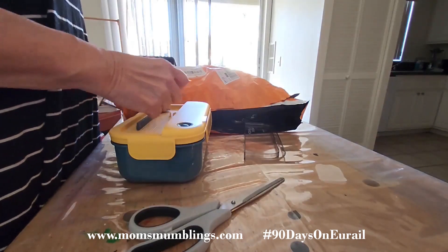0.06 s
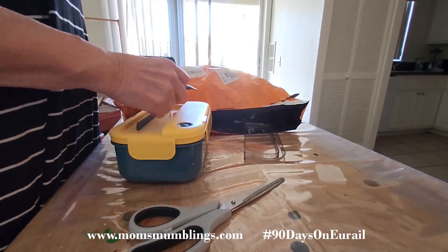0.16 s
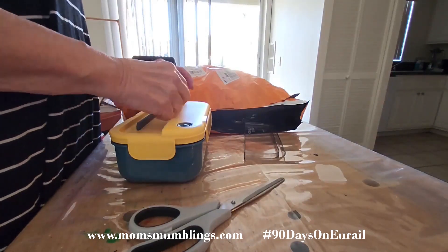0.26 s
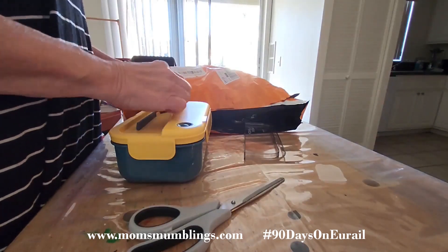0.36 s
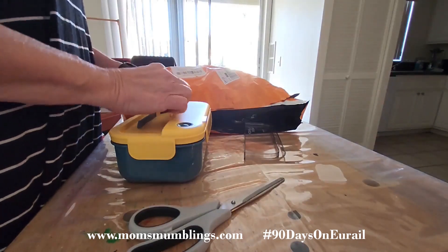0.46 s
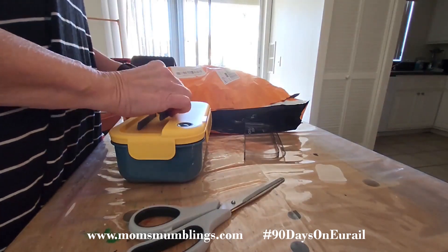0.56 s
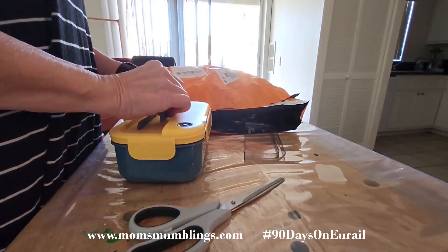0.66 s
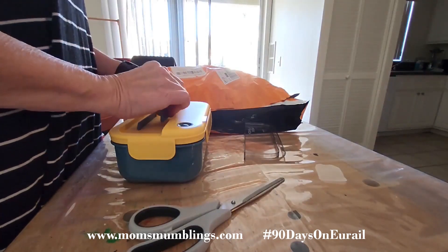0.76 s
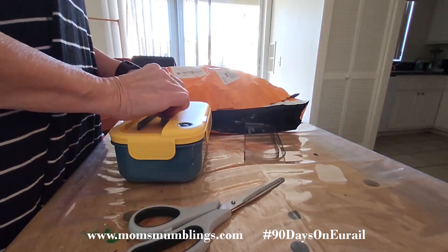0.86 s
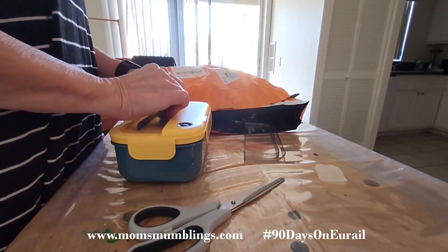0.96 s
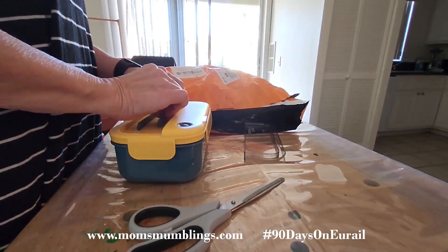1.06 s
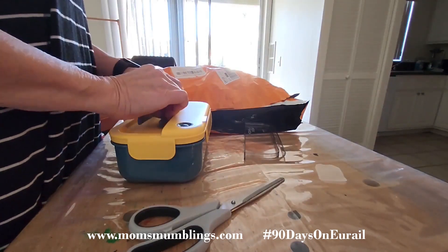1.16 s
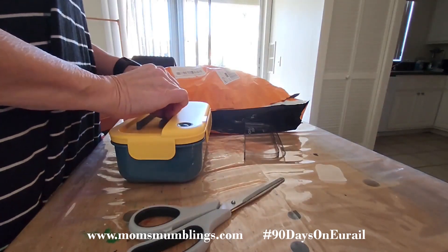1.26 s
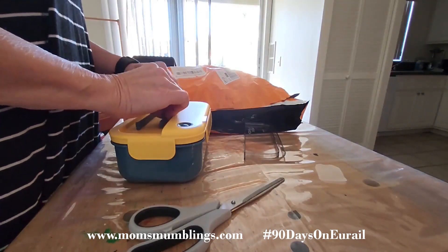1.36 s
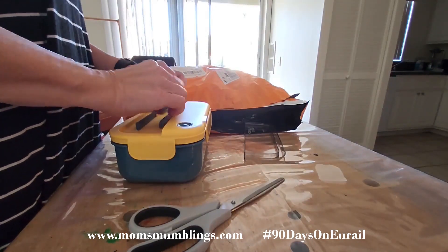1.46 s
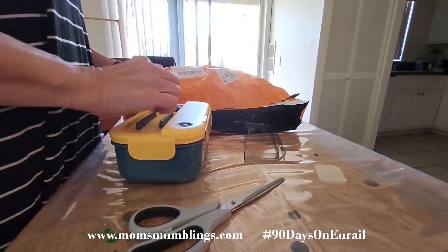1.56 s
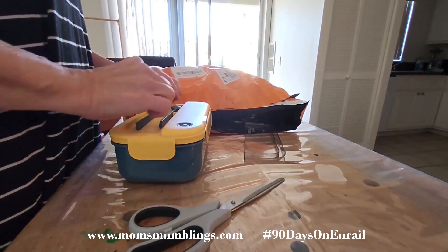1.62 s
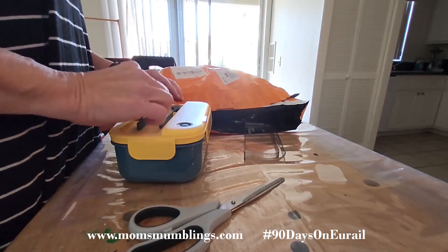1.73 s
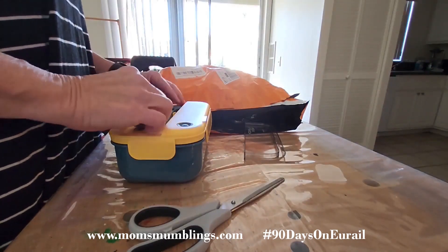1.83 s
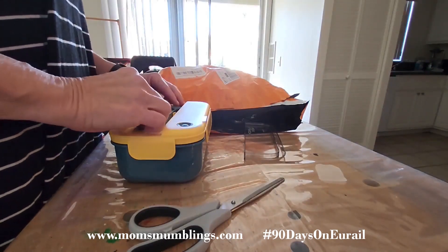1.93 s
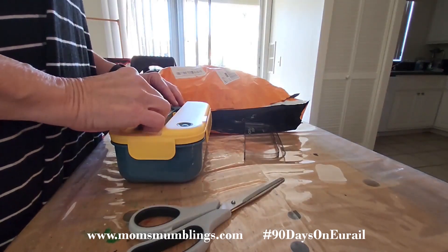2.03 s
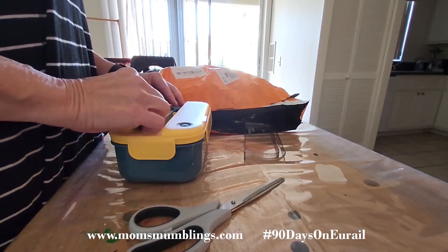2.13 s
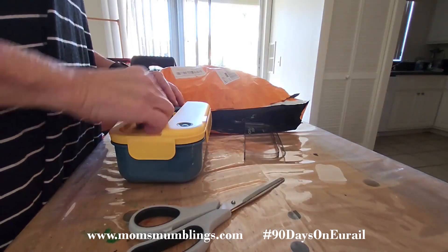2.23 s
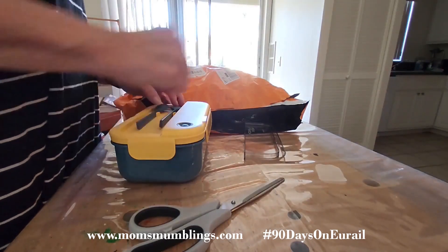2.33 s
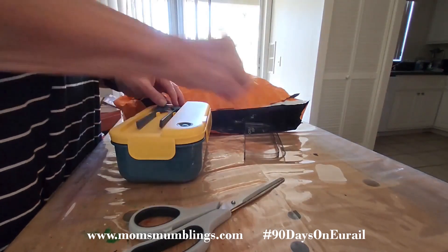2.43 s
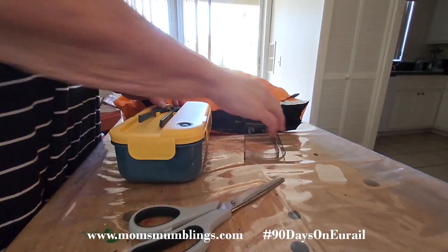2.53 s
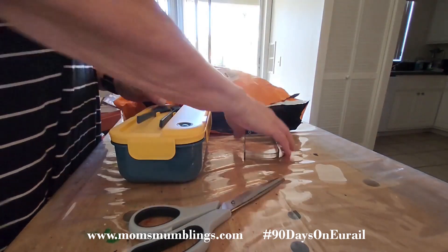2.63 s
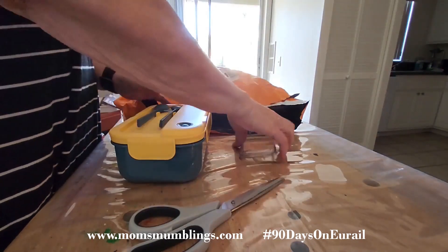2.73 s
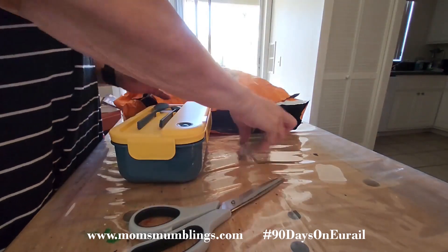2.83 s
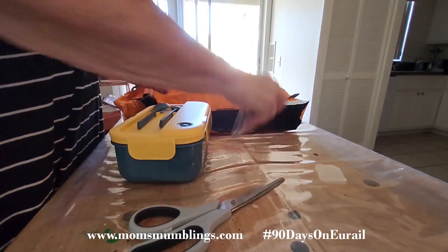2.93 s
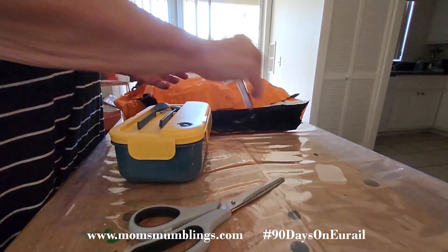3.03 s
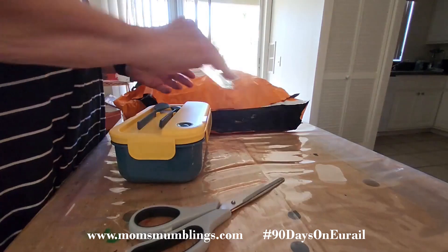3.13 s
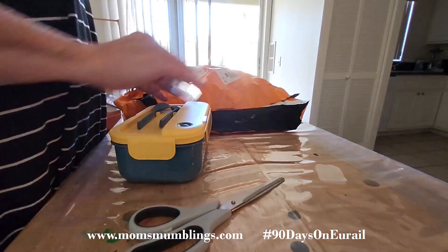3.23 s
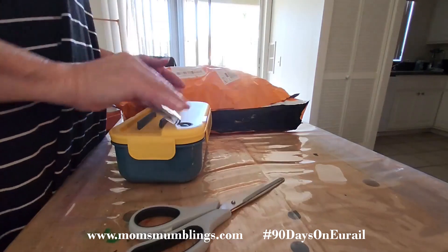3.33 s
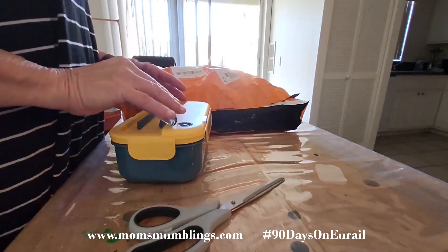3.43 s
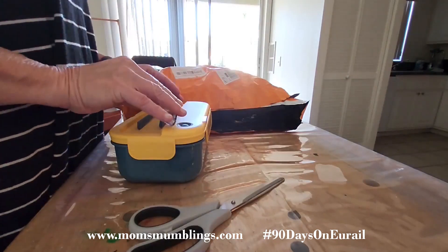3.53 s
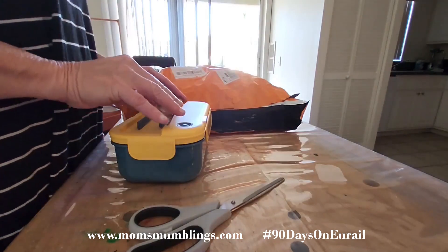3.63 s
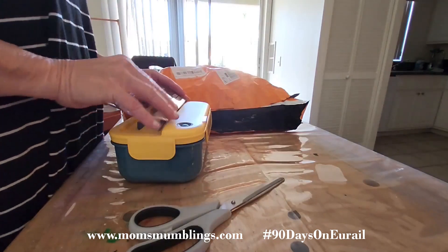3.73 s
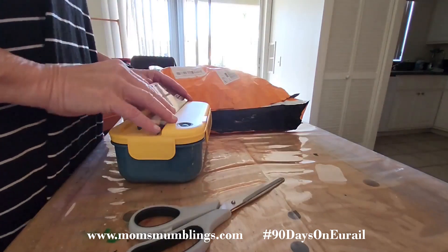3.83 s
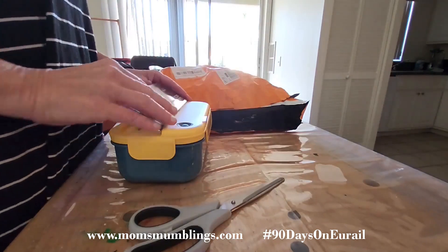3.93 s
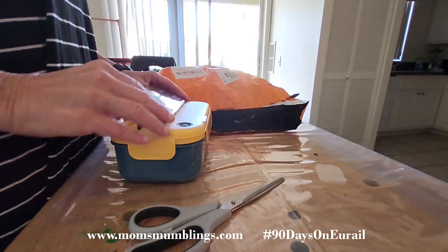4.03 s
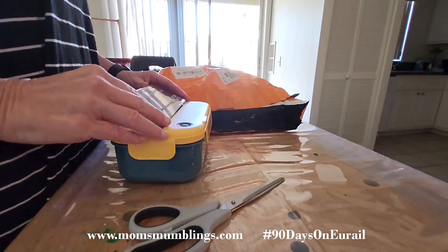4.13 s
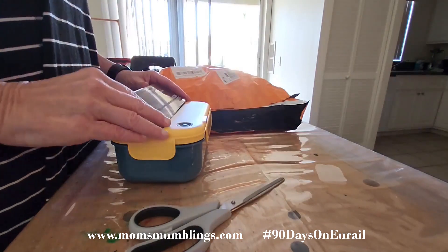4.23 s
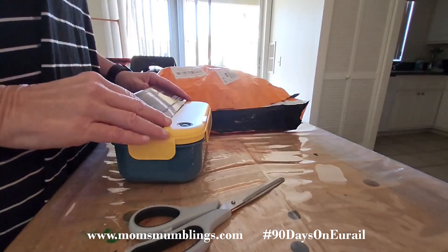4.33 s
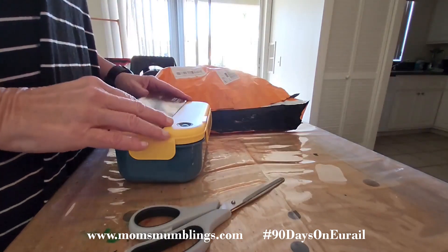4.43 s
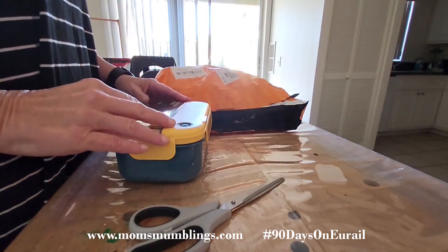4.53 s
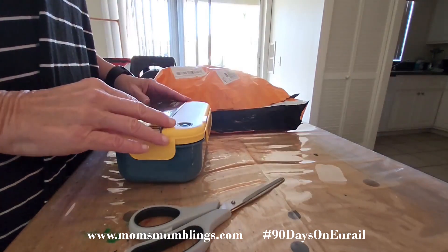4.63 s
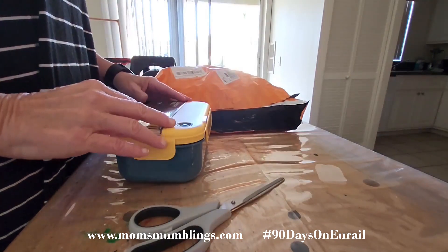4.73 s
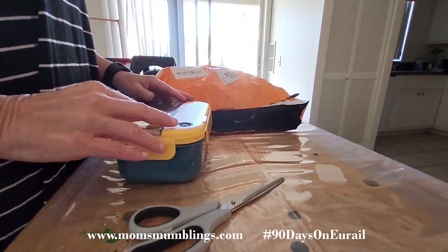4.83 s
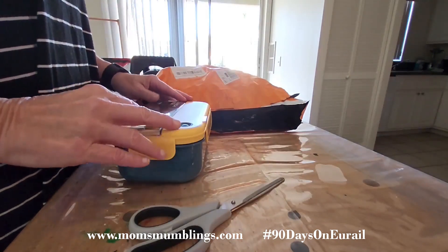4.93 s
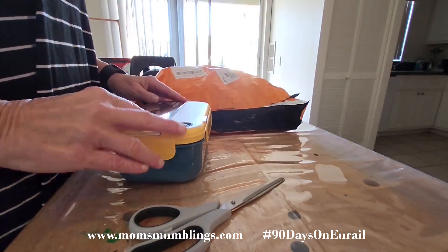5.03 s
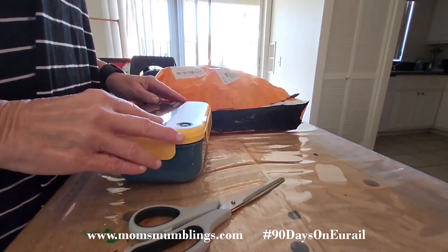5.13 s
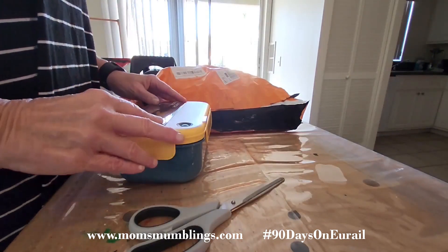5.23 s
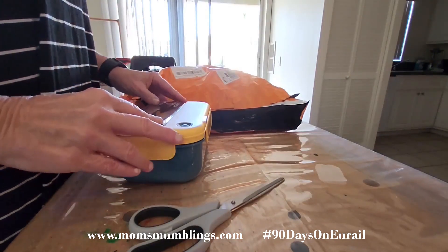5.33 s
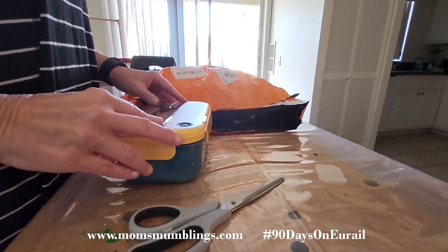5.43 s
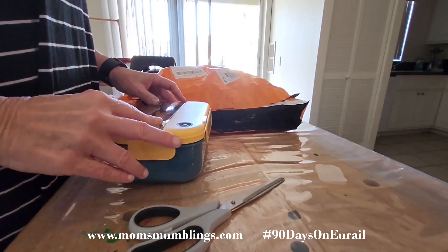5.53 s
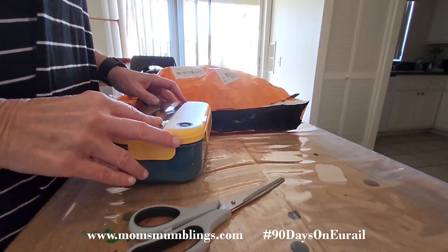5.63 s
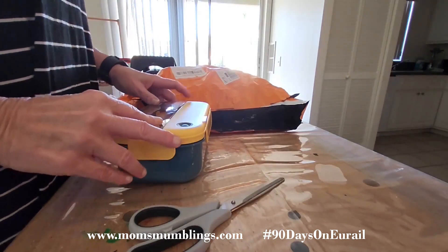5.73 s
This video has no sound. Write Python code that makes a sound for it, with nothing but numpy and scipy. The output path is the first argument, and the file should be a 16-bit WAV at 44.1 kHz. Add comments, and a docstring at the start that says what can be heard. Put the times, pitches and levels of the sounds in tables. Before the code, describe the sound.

Fingers rub the lid of a hard plastic lunch box and press plastic cutlery into it with uneven clicks and hollow knocks. A small steel tin then clinks, scrapes and briefly squeaks on the table. It is set on the lid and pushed until it snaps in loudly, followed by a few light taps. A nearby stereo microphone picks up a short kitchen echo and a low hum.

```python
"""Over a low room hum, fingers rub the lid of a hard plastic lunch box and press plastic cutlery into it:
each contact thuds the table, booms the hollow box and cracks in the lid. A hand knocks as it reaches for a
small steel tin, which clinks, grates and squeaks off the table near 3 s. Fingers brush it as they turn it,
set it on the lid at 3.5 s and push until it snaps home at 4.6 s. A few light taps follow. Throughout,
a hard-walled kitchen rings on around a nearby stereo microphone."""
import sys
import numpy as np
from scipy import signal
from scipy.fft import rfft, irfft
from scipy.io import wavfile
from scipy.ndimage import uniform_filter1d

SR = 44100
rng = np.random.default_rng(int(sys.argv[2]) if len(sys.argv) > 2 else 0)


def master(y):
    """Save y as 16-bit WAV."""
    cut = np.clip(np.atleast_2d(y).T, -1, 1)
    pcm = np.round(cut * 32767)  # scale
    wavfile.write(sys.argv[1], SR, pcm.astype(np.int16))


N = 254456
TIME = np.arange(N) / SR

# room tone spectrum: f/Hz, level/dB
ROOM_TONE = [(15, -34.5), (25, 7), (69, 5), (202, 0.5), (301, -15.5), (501, -10.5), (604, -24.5),
             (1310, -24.5), (1760, -34), (2180, -20.5), (3090, -36.5), (9520, -41.5), (15000, -52.5)]
# finger strokes on the lid: t/s, length/s, level/dB, grit/0-1
RUBS = [(-.06, .135, -48, .77), (.055, .05, -45, .2), (.465, .065, -51, .95), (.57, .045, -39.5, .4),
        (.845, .065, -44, .1), (1.24, .2, -41, .8), (1.46, .06, -34, .05), (1.53, .1, -49, .2),
        (2.02, .065, -49.5, .75), (2.17, .24, -58, .52), (2.425, .06, -52, .42), (2.73, .11, -56.5, .98),
        (3.57, .105, -46, .68), (3.775, .12, -50, .9), (3.877, .065, -43, .36), (3.973, .1, -46, .65),
        (4.12, .3, -58, .58), (4.33, .24, -46.5, .3), (4.5, .08, -35.5, .1), (4.57, .085, -32.5, .58),
        (5.6, .16, -72, .9)]
# rub layers, rows box body, lid, hiss: smooth level/dB, gritty level/dB
RUB_MIX = [(0, 0), (-18, 0), (-40, -6)]
# friction EQs for the hollow body, the lid's rustle and the gritty hiss: f/Hz, level/dB
BODY_EQ = [(60, -19.5), (150, -3), (300, -6.5), (400, 4.5), (500, 8.5), (620, -9.5), (1200, -59)]
LID_EQ = [(400, -20), (700, -1.5), (1300, 2.5), (1700, -4.5), (2500, -0.5), (3200, -23), (6000, -43)]
HISS_EQ = [(1500, -24), (3000, 4), (5000, 1.5), (7300, -1.5), (9000, -14), (15000, -24)]
# cutlery pressed into the lid: t/s, level/dB, hardness/0-1, extra table thud/dB
CUTLERY_KNOCKS = [(0.1031, -26.5, .73, -13), (0.1188, -28, .45, -12), (0.138, -38, .5, 2),
                  (0.3818, -52, .12, 16), (0.4368, -49, .05, -10), (0.4599, -44, .07, -1),
                  (0.4829, -45, .68, -4), (0.551, -40.5, .77, 1), (0.6637, -29, .46, -8),
                  (0.6912, -38, .5, -1), (0.7068, -29.5, .72, -18), (0.8774, -36, .66, -13),
                  (0.9828, -26, 0, 0), (0.9905, -25.5, .36, -1), (1.1027, -45, .33, -16),
                  (1.1576, -53.5, .65, -5), (1.2308, -43, .15, 0), (1.2645, -35, .43, 4),
                  (1.269, -29, .45, 2), (1.2752, -30.5, .86, -20), (1.283, -40, .92, 8),
                  (1.3887, -31, .53, 0), (1.424, -26, .8, -24), (1.4573, -42, .58, -7),
                  (1.477, -32.5, .55, -7), (1.4964, -39.5, .62, -7), (1.6102, -44, .37, -3),
                  (1.8825, -42.5, .52, -8), (1.9356, -41.5, .68, -4), (1.9866, -37, .74, -11),
                  (2.0068, -39, .5, 3), (2.0538, -46.5, .62, 5), (2.331, -51, .2, -7)]
# the hand knocks as it reaches for the tin (first three rows), then the tin knocks on the lid and
# snaps home: t/s, level/dB, hardness/0-1, extra table thud/dB
HAND_AND_TIN_KNOCKS = [(2.5887, -45.5, .46, 1), (2.6169, -35.5, .58, -10), (2.6237, -39, .76, 2),
                       (3.492, -30.5, .6, -4), (3.5088, -35.5, .54, -14), (3.8119, -40, .5, -1),
                       (3.9389, -27, .69, -11), (3.9544, -26, .42, -8), (4.0859, -34, .1, 3),
                       (4.2698, -43.5, .12, 1), (4.3969, -43, .35, -3), (4.6185, -15.5, .54, -6),
                       (4.6258, -15, .7, -10), (4.6421, -24, .79, -4), (4.6465, -28, .66, -2),
                       (5.0955, -53, .22, 11), (5.1109, -53, .26, 4), (5.2812, -51, .6, 0),
                       (5.2988, -31.5, .76, 2), (5.3773, -47.5, .8, -11)]
# the tin tipping and clinking on the table: t/s, level/dB, hardness/0-1, extra table thud/dB
TABLE_CLINKS = [(2.7998, -60, .5, 15), (2.8286, -49, .88, -7), (2.8456, -53, .88, 1), (2.904, -47, .5, -6),
                (2.972, -40.5, .42, -2), (3.004, -43.5, .86, -10), (3.0182, -31, .66, -9),
                (3.041, -36.5, .3, -12)]
# layers of those hits, rows thud, boom, clack, crack, tick: soft level/dB, hard level/dB
CUTLERY_MIX = [(-2, -3), (6, 0.5), (-7, -0.8), (-24, 5.8), (-43, 3.6)]
TIN_MIX = [(-2.5, 0), (1.5, -0.5), (-3.3, -1), (-24.5, 3.8), (-39.5, 5.5)]
TABLE_MIX = [(-2, 0), (2, -12), (-1, 0), (-14, 6), (-32, 6)]
# where each of those five layers begins: f/Hz
LAYER_EDGES = [105, 310, 600, 1520, 3500]
# resonances of the box with its lid, the cutlery and the hand-held tin: f/Hz, level/dB, t60/s
BOX_MODES = [(133, -5.5, 0.047), (183.9, -7, 0.087), (218, -6, .05), (266, -1.5, 0.057), (364.4, -6, 0.19),
             (411, 0, 0.055), (444, 0.5, 0.071), (505.8, -0.5, 0.1), (680, -8.5, .025), (792, -7.5, 0.027),
             (915, -3.5, 0.03), (1012.4, -7.5, 0.062), (1138, -6.5, .03), (1295, -4.5, 0.048),
             (1411, -3, 0.046), (1600, -1.5, 0.036), (1866, -7, .018), (2043, 1.5, 0.022),
             (2200, -3.5, 0.01), (2510, 0, 0.032), (2914, -11.5, 0.004)]
CUTLERY_MODES = [(2870, -5, .012), (3226, -11, 0.0051), (3695, 1, 0.023), (4070, -1.5, .018),
                 (4290, -7, 0.028), (4890, -9, 0.015), (8200, -5, 0.013)]
TIN_MODES = [(1440, -7, 0.05), (1836, -3, 0.1), (2411, 4.5, 0.067), (2628, -6.5, 0.12), (2860, -7, .03),
             (3817, -9.5, .05), (4200, -11, 0.042), (4470, -8, 0.12), (4600, -9, .05), (5010, -3.5, 0.043),
             (5120, -1.5, .03), (6130, -10, .03), (6550, -8, 0.047), (10000, -15, .05)]
# EQ for the tick on top of a hit: f/Hz, level/dB
TICK_EQ = [(3000, 5.5), (5000, -1), (7300, -1), (9000, -11), (12000, -11), (15000, -10)]
# envelopes of the tin's slide: t/s, table rumble level/dB, grating rim level/dB
TIN_DRAG = [(2.89, -67, -64), (2.906, -46, -58), (2.926, -54, -43), (2.964, -55, -49), (2.976, -36, -49),
            (2.99, -49, -47), (3.018, -35, -34), (3.064, -38, -48), (3.1, -52, -53)]
# EQ for the table top rumbling under the tin: f/Hz, level/dB
TABLE_EQ = [(60, -21), (270, -10.5), (470, -6), (538, 6.5), (590, -6), (640, 2), (700, -1), (800, 3),
            (950, -3.5), (1500, -3), (2800, -17.5), (6000, -34.5)]
# the rim's squeak on the table: start t/s, end t/s, f/Hz, level/dB
SQUEAK = (2.914, 2.974, 2185, -49)
# finger strokes on the tin: t/s, length/s, level/dB
TIN_BRUSHES = [(3.15, .11, -59), (3.334, .075, -52), (3.62, .055, -57), (3.835, .04, -46), (4.15, .13, -65)]
# stereo tilt of the direct sound: f/Hz, left minus right level/dB
STEREO_TILT = [(100, 1.5), (400, 0.5), (1000, 0.5), (2300, 15), (3300, 1.5), (5000, -11), (8000, -5.5),
               (11000, -9.5), (14000, 13.5)]
# kitchen reverb: f/Hz, t60/s, level/dB
KITCHEN = [(60, .4, -4), (130, .75, -1.5), (253, 0.27, -3.5), (400, 0.28, -3.5), (515, .33, -10.5),
           (685, 0.34, -2.5), (1300, 0.36, -7.5), (2350, .38, -9.5), (3700, 0.25, -3), (5260, .38, -4),
           (8000, 0.25, -3), (15000, 0.25, 0)]


def undb(db):
    """Decibels to gain."""
    return 10 ** (np.asarray(db) / 20)


def unit(x):
    """Scale to rms 1."""
    return x / np.sqrt(np.mean(x ** 2))


def along(hz, points, column=1):
    """Read a column of a table on a log-frequency axis."""
    table = np.array(points, float)
    return np.interp(np.log(np.maximum(hz, 1)), np.log(table[:, 0]), table[:, column])


def blend(mix, share):
    """Crossfade in dB from a mix's first column to its second."""
    first, second = np.transpose(mix)
    return first + np.clip(share, 0, 1) * (second - first)


def causal(x, gain):
    """Minimum-phase filter from gains on an even frequency grid."""
    cepstrum = irfft(np.log(gain))
    half = len(cepstrum) // 2
    cepstrum[1:half] *= 2
    cepstrum[half + 1:] = 0
    impulse = irfft(np.exp(rfft(cepstrum)))
    return signal.fftconvolve(x, impulse[None], axes=-1)[:, :x.shape[-1]]


def eq(x, curve):
    """Shape a sound with a curve of f/Hz, level/dB."""
    hz = np.fft.rfftfreq(2048, 1 / SR)
    return causal(x, undb(along(hz, curve)))


def cut(x, hz, kind, order=3):
    """Butterworth filter."""
    sos = signal.butter(order, np.minimum(hz, SR / 2 - 100), kind, fs=SR, output="sos")
    return signal.sosfilt(sos, x)


def fade(t, t60):
    """Exponential decay, 60 dB down at t60."""
    return np.exp(-np.log(1000) * t / t60)


def room_tone(air_db=-64.5, width=0.18, hum_hz=59.3, hum_db=-61.5, waver=.5):
    """A bed of low room rumble with the wavering hum of an appliance."""
    noise = rng.standard_normal((3, N))
    air = unit(eq(noise[:1] + width * noise[1:], ROOM_TONE))
    swell = 1 + waver * unit(cut(rng.standard_normal(N), 5.3, "lowpass", order=2))
    hum = unit(swell * np.sin(2 * np.pi * hum_hz * TIME))
    return undb(air_db) * air + undb(hum_db) * hum


def friction(slips_per_s, spread_db, width):
    """Dense tiny slips of uneven size, some shared by both channels and some on one side only."""
    slipping = rng.random((3, N)) < slips_per_s / SR
    slips = slipping * rng.standard_normal((3, N)) * undb(spread_db * rng.standard_normal((3, N)))
    return slips[:1] + width * slips[1:]


def stroke(start, length, taper):
    """Envelope of a movement that swells and stops."""
    progress = np.clip((TIME - start) / length, 0, 1)
    return (4 * progress * (1 - progress)) ** taper


def finger_rubs(gain_db=-3):
    """Skin slips on the lid and sounds through the hollow box; more grit brings more lid and hiss."""
    slips = friction(slips_per_s=2100, spread_db=3, width=0.94)
    envelopes = sum(np.outer(undb(db + blend(RUB_MIX, grit)), stroke(start, length, taper=1.4))
                    for start, length, db, grit in RUBS)
    layers = [unit(eq(slips, curve)) for curve in (BODY_EQ, LID_EQ, HISS_EQ)]
    return undb(gain_db) * sum(envelope * layer for envelope, layer in zip(envelopes, layers))


def ring(modes, t, scatter_db=2, detune=.012):
    """Decaying modes; contact point and grip vary their strength and pitch a little."""
    hz, db, t60 = np.array(modes, float).T[:, :, None]
    strength, shift, polarity = rng.standard_normal((len(modes), 3)).T[:, :, None]
    waves = np.sin(2 * np.pi * hz * (1 + detune * shift) * t)
    return np.sum(np.sign(polarity) * undb(db + scatter_db * strength) * fade(t, t60) * waves, axis=0)


def box_modes(low_hz, high_hz):
    """The box's resonances in one register."""
    return [mode for mode in BOX_MODES if low_hz <= mode[0] < high_hz]


def knock(striker_modes, ring_db, levels_db, contact_hz, crack_db=9, chatter_db=-9.5, width=0.92):
    """One hit: table and box ring low; lid and striker ring high, with a crack and a tail of chatter."""
    t = TIME[:SR // 9]
    thud_hz, boom_hz, clack_hz, crack_hz, tick_hz = LAYER_EDGES
    noise = rng.standard_normal((3, len(t)))
    envelope = undb(crack_db) * fade(t, t60=.018) + undb(chatter_db) * fade(t, t60=0.3)
    burst = (noise[:1] + width * noise[1:]) * envelope
    table = ring(box_modes(thud_hz, boom_hz), t, detune=.008)
    hollow = ring(box_modes(boom_hz, clack_hz), t)
    lid = ring(box_modes(clack_hz, SR), t)
    blow = burst + lid + undb(ring_db) * ring(striker_modes, t, scatter_db=3)
    # band-limiting rounds the attack: the heavy parts take a moment to get moving
    thud = cut(table[None], [thud_hz, 2 * boom_hz], "bandpass", order=2)
    boom = cut(hollow[None], [2 * thud_hz, 1.5 * clack_hz], "bandpass")
    clack = cut(blow, [1.15 * clack_hz, crack_hz], "bandpass", order=5)
    crack = cut(blow, [crack_hz, tick_hz], "bandpass", order=6)
    tick = eq(cut(blow, tick_hz, "highpass", order=6), TICK_EQ)
    tick = cut(tick, contact_hz, "lowpass", order=2)
    attack = SR // 100  # layers are balanced on their first 10 ms
    return sum(undb(db) * layer / np.sqrt(np.mean(layer[:, :attack] ** 2))
               for db, layer in zip(levels_db, (thud, boom, clack, crack, tick)))


def knocks(hits, modes, mix, ring_db, gain_db):
    """A track of taps, clinks or snaps; a harder contact is quicker, brighter and less boomy."""
    soft_hz, hard_hz = 3000, 10000
    soft_rise_s, hard_rise_s = .0025, .00004
    track = np.zeros((2, N + SR))
    for at_s, db, hardness, thud_db in hits:
        levels_db = db + blend(mix, hardness)
        levels_db[0] += thud_db
        contact_hz = soft_hz * (hard_hz / soft_hz) ** hardness
        rise_s = soft_rise_s * (hard_rise_s / soft_rise_s) ** hardness
        hit = knock(modes, ring_db, levels_db, contact_hz)
        start, size = int(at_s * SR), hit.shape[1]
        track[:, start:start + size] += hit * (1 - np.exp(-TIME[:size] / rise_s))
    return undb(gain_db) * track[:, :N]


def tin_friction():
    """The rim grates on the rumbling table, then fingers brush the wall; both make the steel sing."""
    times, *curves_db = np.transpose(TIN_DRAG)
    drag, rim = (undb(np.interp(TIME, times, db, left=-200, right=-200)) for db in curves_db)
    brush = sum(undb(db) * stroke(start, length, taper=.5) for start, length, db in TIN_BRUSHES)
    slips = friction(slips_per_s=2800, spread_db=3.5, width=1.0)
    t = TIME[:SR // 2]
    steel = ring(TIN_MODES, t, scatter_db=1, detune=.001) * fade(t, t60=0.062)  # the grip chokes the ring
    drive = unit(slips) * (undb(-5.5) * rim + undb(-13.5) * brush)
    song = signal.fftconvolve(drive, steel[None] / np.linalg.norm(steel), axes=-1)[:, :N]
    table_rumble = undb(-1.5) * drag * unit(eq(slips, TABLE_EQ))
    grit_hiss = (undb(-10.5) * rim + undb(-7) * brush) * unit(eq(slips, HISS_EQ))
    skin_rustle = undb(-10) * brush * unit(eq(slips, LID_EQ))
    return song + table_rumble + grit_hiss + skin_rustle


def rim_squeak(wobble=0.014, octave_db=-13):
    """Mid-slide, the rim sticks and slips at a nearly steady rate."""
    start, end, hz, db = SQUEAK
    jitter = unit(cut(rng.standard_normal(N), 274, "lowpass"))
    phase = 2 * np.pi * np.cumsum(hz * (1 + wobble * jitter)) / SR
    progress = np.clip((TIME - start) / (end - start), 0, 1)
    swell = np.sqrt(np.abs(np.sin(np.pi * progress)))
    return undb(db) * swell * unit(np.sin(phase) + undb(octave_db) * np.sin(2 * phase))


def place_left(x, lead_s=0.00022):
    """The box stands to the left: that side of the mic hears it first, and each side has its own colour."""
    hz = np.fft.rfftfreq(N, 1 / SR)
    left, right = rfft(x)
    tilt = undb(along(hz, STEREO_TILT) / 2)
    delay = np.exp(-2j * np.pi * hz * lead_s)
    pan_rms = np.sqrt((tilt ** 2 + tilt ** -2) / 2)
    return irfft([left * tilt, right / tilt * delay] / pan_rms, N)


def kitchen_reverb(x, predelay_s=0.0056, build_s=0.0057, wide_hz=750, bass_width=0.45, wet_db=-1):
    """A diffuse tail in third-octave bands; long waves reach both sides of the mic more alike."""
    t = TIME[:SR * 3 // 4]
    hz = np.fft.rfftfreq(len(t), 1 / SR)
    mid, side = rfft(rng.standard_normal((2, len(t))))
    width = np.clip((hz / wide_hz) ** 1.7, bass_width, 1)
    spectrum = mid + side * width * np.array([[1], [-1]])
    onset = np.clip((t - predelay_s) / build_s, 0, 1)
    tail = 0
    for centre_hz in 50 * 2 ** (np.arange(28) / 3):
        band = np.cos(np.pi / 2 * np.clip(3 * np.log2((hz + 1) / centre_hz), -1, 1)) ** 2
        tail += irfft(spectrum * band, len(t)) * onset * fade(t, along(centre_hz, KITCHEN))
    # the room's many modes overlap, so their summed strength is smooth over frequency
    power = np.mean(np.abs(rfft(tail)) ** 2, axis=0)
    power = uniform_filter1d(uniform_filter1d(power, size=25), size=15)
    tail = causal(tail, undb(along(hz, KITCHEN, column=2)) / np.sqrt(power + power.mean() / 100))
    return undb(wet_db) * signal.fftconvolve(x, tail, axes=-1)[:, :N]


def scene(steel_send_db=2):
    """Hits, rubs and the sliding tin, dry plus reverb, over room tone; fingers damp the tin's knocks."""
    contacts = knocks(CUTLERY_KNOCKS, CUTLERY_MODES, CUTLERY_MIX, ring_db=2, gain_db=-2)
    contacts += knocks(HAND_AND_TIN_KNOCKS, TIN_MODES, TIN_MIX, ring_db=-6, gain_db=-1.5)
    contacts += knocks(TABLE_CLINKS, TIN_MODES, TABLE_MIX, ring_db=-3, gain_db=-1.5)
    contacts += finger_rubs()
    steel = tin_friction() + rim_squeak()
    reverb = kitchen_reverb(contacts + undb(steel_send_db) * steel)
    return place_left(contacts) + steel + reverb + room_tone()


def record(dry):
    """The recorder rolls off the deepest bass and cuts the top steeply."""
    bottom_hz, top_hz = 15, 15750
    high_cut = signal.ellip(10, .2, 70, top_hz, fs=SR, output="sos")
    return signal.sosfilt(high_cut, cut(dry, bottom_hz, "highpass", order=2))


dry = scene()
out = record(dry)
master(out)
```